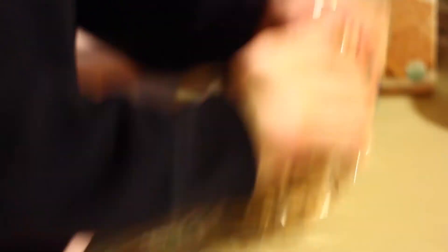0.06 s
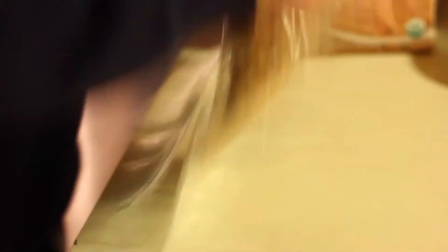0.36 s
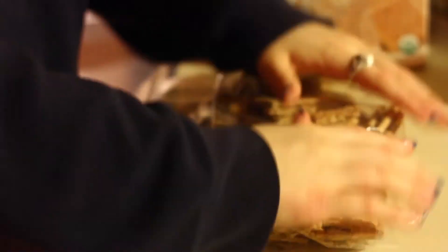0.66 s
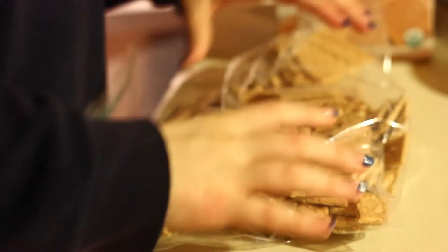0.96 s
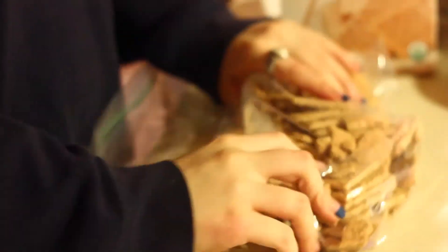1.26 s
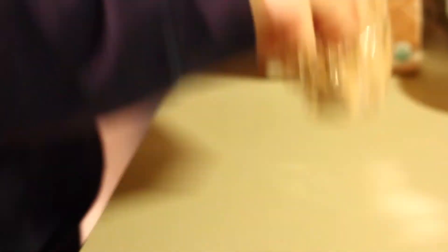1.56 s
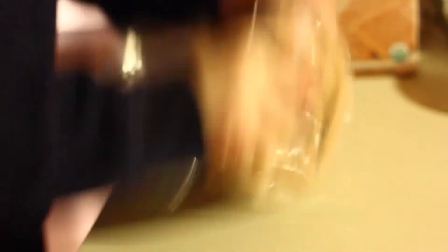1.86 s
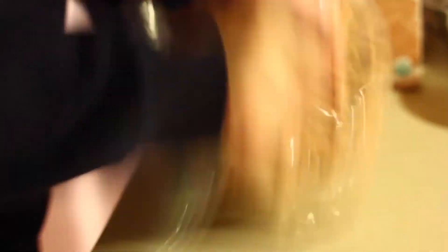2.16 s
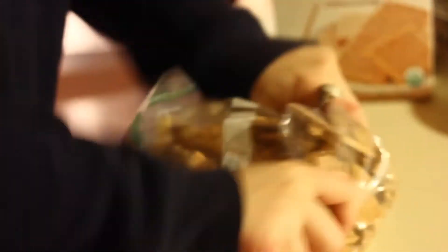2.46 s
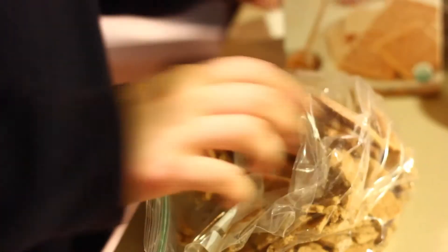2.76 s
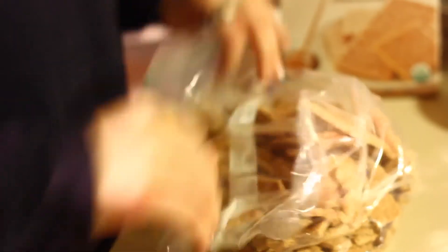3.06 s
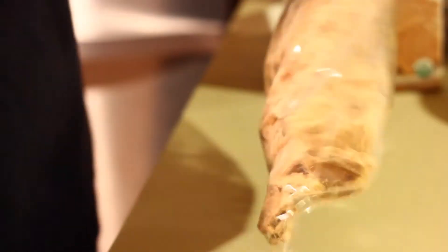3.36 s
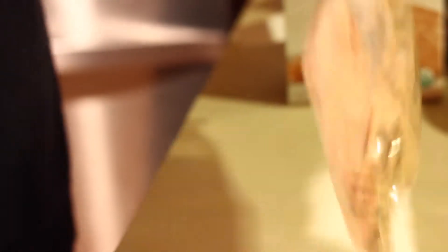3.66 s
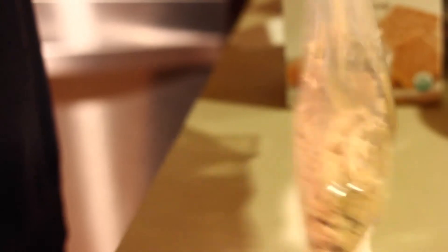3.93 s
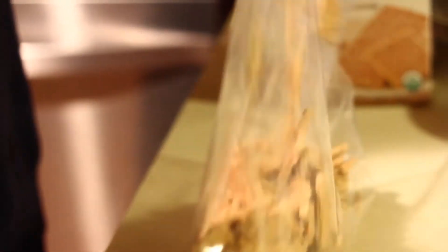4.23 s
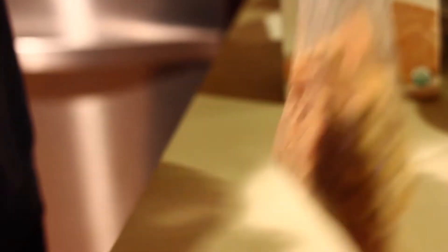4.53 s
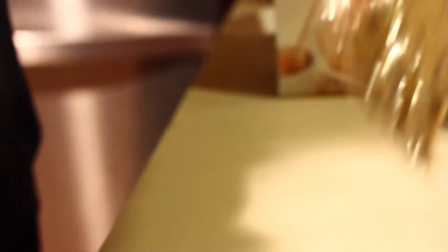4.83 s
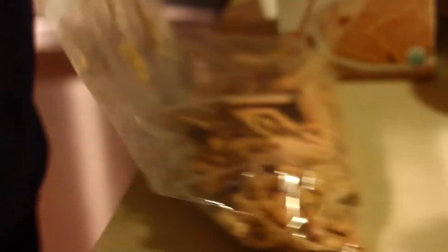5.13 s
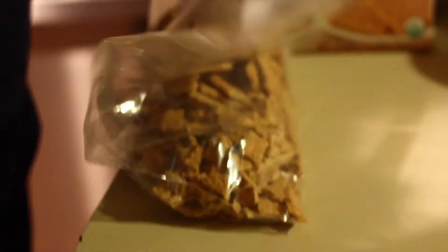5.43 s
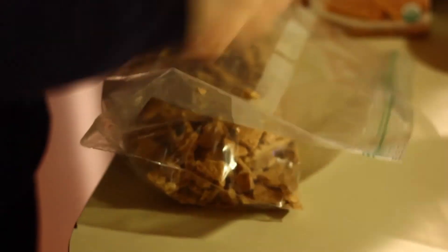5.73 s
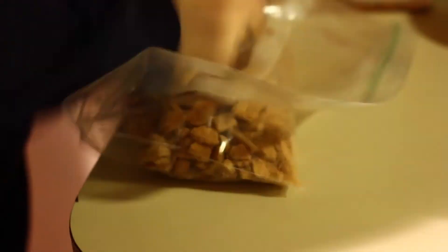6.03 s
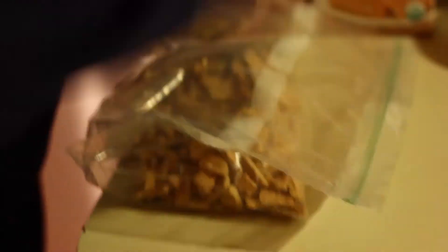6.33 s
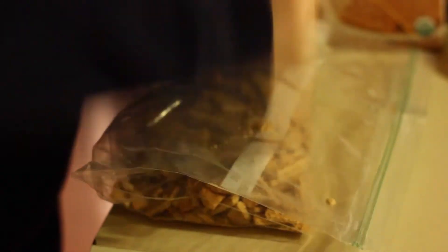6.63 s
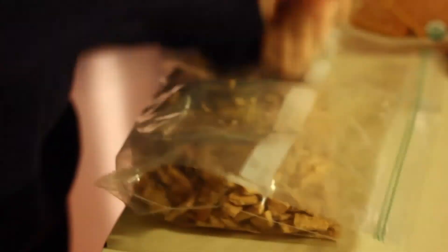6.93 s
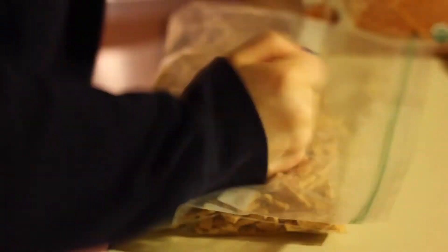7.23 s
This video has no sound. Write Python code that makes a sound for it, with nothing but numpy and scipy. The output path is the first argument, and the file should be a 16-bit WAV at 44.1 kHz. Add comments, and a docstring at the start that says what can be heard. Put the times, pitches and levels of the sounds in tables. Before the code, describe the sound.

A plastic bag of crackers is handled close to the microphone on a kitchen counter. It starts with crinkling plastic, sliding pieces and a sharp snap, then a loud crunch with a dull thump at 0.5 seconds. Rustling continues as the bag is turned. From about 1.9 to 2.5 seconds come four quick, loud crunches mixed with squeezing. Between 3 and 4.7 seconds the bag is lifted and shaken, pieces rustling in swells while the plastic snaps and scrapes. It drops with a softer crunch at 5 seconds, followed by faint crinkling. From 6.1 seconds to the end at about 7.4, a fist pounds it roughly eight times, faster and faster, each blow crunching and thumping the counter, the loudest slightly distorted. Something metal rattles briefly under the last blows. The kitchen adds short reflections and a faint, steady hush.

```python
"""Crackers crushed in a plastic bag on a kitchen counter, close to the microphone.
The bag is pressed, turned, shaken, dropped, then pounded with a fist, faster and faster.
Each blow is a burst of fractures and thumps the counter; the loudest clip the recorder.
Sliding pieces rustle, the film crinkles and scrapes, late blows rattle something of metal.
Behind: short kitchen reflections and a faint hush."""
import sys
import numpy as np
from scipy import signal
from scipy.fft import rfft, irfft
from scipy.io import wavfile
from scipy.ndimage import uniform_filter1d

SR = 44100
rng = np.random.default_rng(int(sys.argv[2]) if len(sys.argv) > 2 else 0)


def waveform_to_disk(signal):
    """Save audio, clipped to [-1, 1], as 16-bit WAV at the path in sys.argv[1]."""
    frames = np.transpose(np.atleast_2d(signal))
    scaled = np.clip(frames, -1, 1) * 32767
    samples = np.round(scaled).astype(np.int16)
    wavfile.write(sys.argv[1], SR, samples)


N = 330132
TIME = np.arange(N) / SR

# blows on the bag: peak t/s, crunch level/dB, rise/s, fall/s, thump level/dB
BAG_BLOWS = [(.501, -11, .008, .0077, -44), (0.519, 2.5, .013, 0.016, -15.5),
             (1.876, 4, 0.0036, 0.016, -19), (2.088, 0, 0.0068, 0.019, -24), (2.289, 0, 0.0063, 0.017, -22),
             (2.496, 2, 0.0084, 0.014, -25.5), (3.999, -15, 0.004, 0.0095, -44.5),
             (5.050, -14, 0.0026, 0.045, -37.5), (5.102, -16, .015, 0.041, -46),
             (6.098, 3.5, 0.0084, 0.013, -16.5), (6.126, -12, .005, 0.014, -33),
             (6.309, -1, 0.0046, 0.017, -25), (6.333, -10, 0.0075, 0.018, -40),
             (6.526, -6, 0.0053, .011, -18.5), (6.544, -3, 0.011, 0.012, -20),
             (6.761, -.5, 0.0059, 0.0073, -19), (6.94, -1.5, 0.0085, 0.0086, -19.5),
             (7.083, 1.5, .0064, 0.0062, -15), (7.2, -5.5, 0.015, 0.0089, -21.5),
             (7.298, -14, 0.0079, .006, -23.5), (7.306, 3, 0.0033, 0.0034, -15),
             (7.395, -6.5, 0.0099, 0.014, -19.5)]
# counter modes: f/Hz, width/Hz, relative level/dB
COUNTER_MODES = [(80, 18, -3), (101, 44, -8), (165, 49, -3.5), (241.3, 17, -6), (388, 120, 4.5)]
# bag lifted, turned, laid down: peak t/s, level/dB, rise/s, fall/s, heap/dB rel, fizz/dB rel
BAG_SLIDES = [(0.0, -19, .05, 0.045, -1, -18), (.068, -17.5, 0.056, 0.11, -3, -8.5),
              (.25, -29, .04, 0.072, -4.5, -6.5), (.5, -18, .055, .04, -4.5, -10),
              (.6, -29, 0.026, 0.087, -10, -10), (.8, -35, 0.093, .028, -7.5, -16.5),
              (1.13, -51.5, 0.062, .03, -12, -22.5), (1.2, -18.5, 0.023, 0.11, -3.5, -10),
              (1.34, -25.5, 0.05, .05, -13, -10), (1.42, -23.5, 0.12, .13, -3, -9),
              (1.585, -24.5, 0.088, 0.059, -6.5, -7), (1.855, -18.5, 0.082, .04, -5, -8),
              (2.14, -21, 0.078, .04, -14, -12), (2.38, -15.5, 0.05, .035, -2.5, -8.5),
              (2.6, -25.5, 0.15, 0.045, -8, -11), (2.69, -25, 0.067, .045, -7.5, -12),
              (2.95, -51.5, 0.11, 0.099, -3.5, -14), (3.04, -31, 0.027, 0.15, -10.5, -10),
              (3.178, -28.5, .008, .04, -15, -6), (3.292, -16.5, 0.08, .085, -4.5, -9),
              (3.405, -28, 0.032, 0.028, 2, -16), (4.145, -33, .04, 0.037, -24, -10),
              (4.31, -29.5, 0.038, 0.13, -14, -13), (4.6, -40.5, 0.044, .13, -15, -15),
              (4.97, -53, 0.105, 0.15, -7, -15), (5.04, -46, .02, 0.0075, 4, -8),
              (5.2, -34, 0.046, 0.062, -6, -7.5), (5.385, -37.5, .11, .11, -11, -13.5),
              (5.55, -47, .04, .05, -8, -15.5), (5.69, -58, 0.066, 0.14, -1, -11),
              (6.07, -51.5, 0.028, .01, 3, -12)]
# finger squeezes: peak t/s, level/dB
BAG_SQUEEZES = [(1.272, -16), (1.96, -12.5), (2.048, -14.5), (2.19, -15), (2.264, -12), (2.468, -12)]
# every squeeze: rise/s, fall/s, heap/dB rel, fizz/dB rel
SQUEEZE_SHAPE = (0.0243, 0.0264, -4, -9)
# bag shaken, heap falls back: peak t/s, level/dB, rise/s, fall/s
BAG_SHAKES = [(3.54, -17.5, .026, 0.065), (3.705, -26, 0.027, 0.026), (3.78, -16, .04, 0.039),
              (3.975, -24.5, 0.066, 0.089), (4.22, -18, .024, .032), (4.703, -30.5, 0.02, .048)]
# every shake: heap/dB rel, fizz/dB rel
SHAKE_BALANCE = (-5.5, -9.5)
# single snaps of film or cracker: t/s, peak level/dB, f/Hz, tick/dB rel
SINGLE_SNAPS = [(0.062, -6, 1780, -14.5), (0.3, -23, 2390, -13.5), (.321, -16, 2230, -6.5),
                (.727, -24, 3590, -2), (0.785, -17, 1110, -30), (.786, -28.5, 450, -30),
                (.813, -21, 1630, -17), (0.871, -35, 1210, -34), (1.099, -17.5, 3100, -35),
                (1.142, -16.5, 2980, -38), (1.652, -17, 3720, -27), (2.624, -14, 3600, -3),
                (2.899, -26, 3430, -23), (2.904, -41, 398, -29), (2.978, -19, 3760, -17),
                (3.034, -19, 3210, -6), (3.074, -15.5, 2280, -8), (3.172, -10.5, 3310, -4),
                (3.37, -10.5, 2990, -3), (3.608, -18, 2100, 0), (4.214, -4.5, 3300, -26),
                (4.223, -10, 2410, -25), (4.25, -14, 1170, -32), (4.593, -28, 2380, -5),
                (4.614, -21.5, 3030, -35), (4.691, -22, 2530, -14), (4.857, -30, 3100, -33),
                (4.892, -30, 2810, -22), (4.946, -29.5, 2680, -24), (5.345, -33, 2560, 0),
                (5.395, -27, 1570, -23), (5.733, -38, 1190, -25.5), (7.025, -14, 1440, -29)]
# bag rubs and drags: centre t/s, length/s, level/dB, f/Hz, width/Hz
BAG_SCRAPES = [(.30, .10, -36.5, 373, 156), (1.019, 0.043, -54.5, 343, 151),
               (1.095, .10, -56.5, 3070, 1203), (3.123, 0.28, -41.5, 985, 55), (3.3, 0.19, -30, 870, 160),
               (3.942, .06, -42, 380, 150), (4.716, 0.16, -47.5, 335, 130.2), (4.977, 0.19, -52, 3160, 697),
               (5.547, 0.11, -45.5, 3400, 500), (5.535, 0.12, -60, 8100, 496), (6.848, 0.06, -24, 406, 160)]
# jolts of the metal: peak t/s, level/dB, 1/e half-width/s
METAL_JOLTS = [(7.122, -31, .008), (7.132, -25, .012), (7.351, -17, 0.0046), (7.367, -22, 0.014),
               (7.388, -30, 0.01), (7.417, -26, 0.011)]
# metal modes: f/Hz, relative level/dB
METAL_MODES = [(4630, 4), (5795, 2.5), (6830, -5), (7880, -11), (8800, -1), (9340, -7), (10200, -1),
               (10480, -7), (11300, -15), (12250, -13), (14950, -16)]
# spectral shapes: f/Hz, relative level/dB
CRUNCH_SPECTRUM = [(30, -24), (90, -10.5), (220, -1.5), (400, 3.5), (560, -0.5), (760, 4), (1050, 2),
                   (1500, 3), (2300, -0.5), (3600, 2.5), (4600, -8), (8000, -14), (11000, -19.5),
                   (16000, -27)]  # breaking crackers
PIECE_SPECTRUM = [(100, -39.5), (550, -17.5), (900, 2), (1400, 3.5), (2200, 3.5), (3000, 5), (3700, 5.5),
                  (4200, -1), (4700, -4.5), (6000, -16), (9000, -26.5), (16000, -65)]  # loose pieces
HEAP_SPECTRUM = [(30, -40.5), (90, -16), (145, -8.5), (230, 0), (400, 5), (650, 0.5), (950, -1.5),
                 (1500, -29), (3000, -60)]  # heap as a whole
FIZZ_SPECTRUM = [(1000, -39), (3500, -12.5), (5500, 4.5), (8300, 3.5), (10500, -2), (16000, -6)]  # crumbs and film
HUSH_SPECTRUM = [(30, -13.5), (90, -0.5), (210, 1.5), (450, -4.5), (800, -12.5), (2400, -19), (6000, -24.5),
                 (16000, -28)]  # quiet kitchen
# room decay: f/Hz, T60/s
ROOM_T60 = [(60, 0.21), (160, 0.56), (420, 0.25), (1100, 0.45), (3000, 0.43), (8000, 0.37), (16000, 0.16)]
# room return: f/Hz, level/dB
ROOM_RETURN = [(60, -3), (400, 4.5), (1200, -4), (3500, -4), (6000, -4.5), (16000, -22.5)]


def crunches(settle_db=-20, settle_s=0.049):
    """A blow breaks many crackers at once; the pieces then settle."""
    power = np.zeros(N)
    t = np.arange(-SR // 10, SR // 2) / SR
    before, after = np.minimum(t, 0), np.maximum(t, 0)
    for peak_s, level_db, rise_s, fall_s, _ in BAG_BLOWS:
        burst = np.exp(-(before / rise_s) ** 2 - (after / fall_s) ** 1.25)
        settle = amp(settle_db) * np.exp(before / 0.0039 - after / settle_s)
        add(power, peak_s + t[0], amp(level_db) ** 2 * (burst ** 2 + settle ** 2))
    breaks = impulses(per_s=14000, spread_db=3, window_samples=400)
    return colour(breaks * np.sqrt(power), CRUNCH_SPECTRUM)


def thumps(attack_s=0.00067, push_s=0.0092, shudder_db=-15, shudder_s=0.08, gain_db=1.5):
    """The collapsing heap pushes unevenly on the counter, which booms and shudders."""
    envelope, t = np.zeros(N), TIME[:SR // 2]
    for start_s, *_, level_db in BAG_BLOWS:
        push = np.exp(-t / push_s) + amp(shudder_db) * np.exp(-t / shudder_s)
        add(envelope, start_s, amp(level_db) * push * (1 - np.exp(-t / attack_s)))
    force = envelope * rng.standard_normal(N)
    return sum(amp(db + gain_db) * mode(force, hz, width_hz) for hz, width_hz, db in COUNTER_MODES)


def movement_gains(crest_s=0.0036, onset_power=1.5, heap_power=1.21):
    """Gains of pieces, heap and fizz: movements swell, die away and add in power."""
    squeezes = [(*row, *SQUEEZE_SHAPE) for row in BAG_SQUEEZES]
    shakes = [(*row, *SHAKE_BALANCE) for row in BAG_SHAKES]
    t, power = TIME[::40], 0
    for peak_s, level_db, rise_s, fall_s, heap_db, fizz_db in BAG_SLIDES + squeezes + shakes:
        away_s = abs(np.hypot(t - peak_s, crest_s) - crest_s)  # rounded crest
        swell = np.exp(-np.where(t < peak_s, (away_s / rise_s) ** onset_power, away_s / fall_s))
        heap = amp(heap_db) * swell ** heap_power  # swells later, dies sooner than loose pieces
        gains = amp(level_db) * np.array([swell, heap, amp(fizz_db) * swell])
        power = power + gains ** 2
    return [np.interp(TIME, t, np.sqrt(p)) for p in power]


def ringing_pieces(hits, decay_at_1khz_s=0.0014, ring_share=0.39, count=24):
    """Each impulse hits one small piece, which rings a few cycles at its own pitch."""
    struck = rng.integers(0, count, N)
    rings, t = np.zeros(N), TIME[:SR // 100]
    for piece, hz in enumerate(np.geomspace(700, 12000, count)):
        decay_s = decay_at_1khz_s * np.sqrt(1000 / hz)
        ring = unit(np.sin(2 * np.pi * hz * t) * np.exp(-t / decay_s)) * np.sqrt(hz)
        rings += signal.oaconvolve(hits * (struck == piece), ring)[:N]
    return np.sqrt(1 - ring_share) * hits + np.sqrt(ring_share) * unit(rings) * hits.std()


def rustle(knock_db=-2.5, heap_db=-4.5, fizz_db=-0.5, crease_s=0.00066):
    """Pieces slide and knock; the heap adds weight, crumbs and film add fizz."""
    piece_gain, heap_gain, fizz_gain = movement_gains()
    bustle = np.clip(piece_gain / amp(-19.5), 0.03, 2) ** 0.4  # gentle handling: fewer contacts
    knocks = ringing_pieces(impulses(per_s=8000 * bustle, spread_db=3, cap=4.3))
    heap = unit(knocks + 2 * impulses(per_s=3800, spread_db=3.5))
    # a crease gives way in a brief flurry of slips
    creases = impulses(per_s=100, spread_db=7.5, window_samples=9000)
    flurry_power = signal.lfilter([1], [1, -np.exp(-1 / (crease_s * SR))], creases ** 2)
    film = impulses(per_s=6000 * bustle, spread_db=1)
    film += 0.81 * unit(np.sqrt(flurry_power) * rng.standard_normal(N))
    return (colour(knocks * piece_gain * amp(knock_db), PIECE_SPECTRUM)
            + colour(heap * heap_gain * amp(heap_db), HEAP_SPECTRUM)
            + colour(unit(knocks + film) * fizz_gain * amp(fizz_db), FIZZ_SPECTRUM))


def snaps(pieces_db=-7, band_ratio=1.27, crack_s=0.002):
    """A crease buckles or a cracker snaps: the crack rings its patch and nearby pieces, and ticks."""
    out, t = np.zeros(N), TIME[:SR // 40]
    for start_s, peak_db, hz, tick_db in SINGLE_SNAPS:
        crack = np.sign(rng.standard_normal(len(t))) * np.exp(-t / crack_s)
        band_hz = np.clip([hz / band_ratio - 200, hz * band_ratio + 200], 200, 5200)
        ring = signal.sosfilt(signal.butter(6, band_hz, "bandpass", fs=SR, output="sos"), crack)
        tick = np.convolve(crack, click(FIZZ_SPECTRUM))[:len(t)]
        pieces = np.convolve(crack, click(PIECE_SPECTRUM))[:len(t)]
        snap = unit(ring) + amp(pieces_db) * unit(pieces) + amp(tick_db) * unit(tick)
        add(out, start_s + 0.0005, amp(peak_db) * snap / abs(snap).max())
    return out


def scrapes():
    """Quick slips of the film excite one resonance per stroke."""
    out, slips = np.zeros(N), impulses(per_s=4800, spread_db=-1)
    for centre_s, length_s, level_db, hz, width_hz in BAG_SCRAPES:
        stroke = slips[round(centre_s * SR):][:round(length_s * SR)]
        note = unit(resonate(resonate(stroke, hz, width_hz), hz, width_hz))
        fade = signal.windows.tukey(len(note), 0.7)
        add(out, centre_s - length_s / 2, amp(level_db) * note * fade)
    return out


def rattle(width_hz=35, contact_db=-7):
    """Jolted metal on the counter: tiny bounces tick and ring its high modes."""
    envelope = sum(amp(db) * np.exp(-((TIME - peak_s) / half_width_s) ** 2)
                   for peak_s, db, half_width_s in METAL_JOLTS)
    bounces = envelope * impulses(per_s=1800, spread_db=4, window_samples=400)
    ring = sum(amp(db) * mode(bounces, hz, width_hz) for hz, db in METAL_MODES)
    ring /= np.linalg.norm([amp(db) for _, db in METAL_MODES])  # modes share the energy
    return ring + amp(contact_db) * colour(bounces, FIZZ_SPECTRUM)


def reflections(x, gap_s=0.0096, per_s=5000):
    """Dense echoes off counter, cupboards and walls; the treble dies first."""
    size = SR * 3 // 4
    taps = rng.choice([-1., 1.], size) * (rng.random(size) < per_s / SR) * (TIME[:size] > gap_s)
    hz, t, bands = signal.stft(taps, SR, nperseg=256)
    decay = amp(-60 * t / lookup(ROOM_T60, hz)[:, None])
    tail = signal.istft(bands * decay, SR, nperseg=256)[1]
    return_gain = amp(lookup(ROOM_RETURN, np.fft.rfftfreq(len(tail), 1 / SR)))
    response = irfft(rfft(tail) / np.linalg.norm(tail) * return_gain)
    return signal.oaconvolve(x, response)[:N]


def hush(level_db=-63):
    """Steady, dull noise of the quiet kitchen."""
    return amp(level_db) * colour(rng.standard_normal(N), HUSH_SPECTRUM)


def impulses(per_s, spread_db, cap=4.06, window_samples=2200):
    """Random impulses of uneven height, levelled to unit power over the window."""
    height = amp(spread_db * np.minimum(rng.exponential(1, N), cap))
    train = height * rng.choice([-1, 1], N) * (rng.random(N) < per_s / SR)
    local_power = abs(uniform_filter1d(train ** 2, window_samples))
    return train / np.sqrt(local_power + 1e-6)


def click(spectrum, size=2048):
    """Minimum-phase click with this spectrum, unit energy."""
    hz = abs(np.fft.fftfreq(size, 1 / SR))
    log_gain = np.log(amp(lookup(spectrum, hz)))
    wave = np.fft.ifft(np.exp(np.conj(signal.hilbert(log_gain)))).real[:size // 2]
    return wave / np.linalg.norm(wave)


def colour(x, spectrum):
    """Gives each impulse in x this spectrum."""
    return signal.oaconvolve(x, click(spectrum))[:N]


def resonate(x, hz, width_hz):
    """Resonance, unit peak gain."""
    return signal.lfilter(*signal.iirpeak(hz, hz / width_hz, fs=SR), x)


def mode(force, hz, width_hz):
    """Resonance whose output power under noise does not depend on its width."""
    return resonate(force, hz, width_hz) * np.sqrt(SR / (np.pi * width_hz))


def amp(db):
    """dB to gain."""
    return 10 ** (np.asarray(db) / 20)


def unit(x):
    """Scales to unit rms."""
    return x / np.sqrt(np.mean(x ** 2) + 1e-20)


def lookup(table, hz):
    """Interpolates over log frequency."""
    table_hz, values = np.transpose(table)
    return np.interp(np.log(hz + 1), np.log(table_hz + 1), values)


def add(mix, start_s, sound):
    """Mixes a sound in at start_s."""
    part = mix[max(round(start_s * SR), 0):][:len(sound)]
    part += sound[:len(part)]


def scene(drift_hz=0.6096):
    """Bag, counter and room, mono."""
    handling = rustle() + snaps() + scrapes()
    blows = crunches() + rattle() + thumps()
    # the bag moves: blows drift between two reflection patterns
    drift_rad = 2 * np.pi * drift_hz * TIME
    room = reflections(amp(-12.5) * handling + amp(-11.5) * blows * np.cos(drift_rad))
    room += reflections(amp(-11) * blows * np.sin(drift_rad))
    return (handling + blows + room + hush())[None]


def record(dry, low_cut_hz=50, band_limit_hz=15900):
    """Microphone low cut, clipping at full scale, band limit."""
    low_cut = signal.butter(2, low_cut_hz, "highpass", fs=SR, output="sos")
    clipped = np.clip(signal.sosfilt(low_cut, dry), -1, 1)
    low_pass = signal.firwin(511, band_limit_hz, window=("kaiser", 8), fs=SR)
    return signal.oaconvolve(clipped, low_pass[None], "same")


dry = scene()
out = record(dry)
waveform_to_disk(out)
```